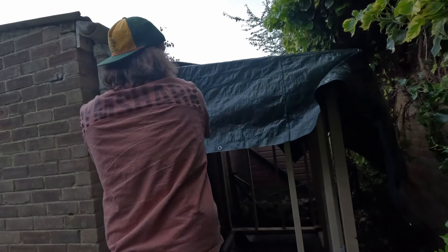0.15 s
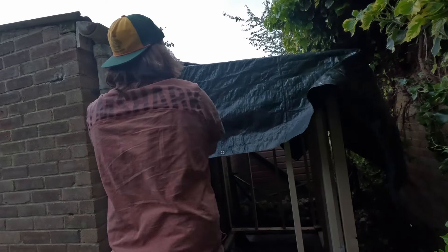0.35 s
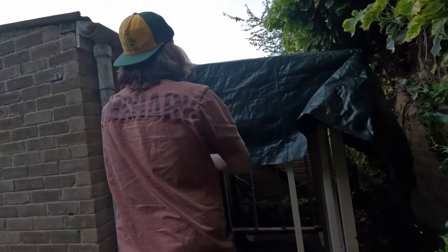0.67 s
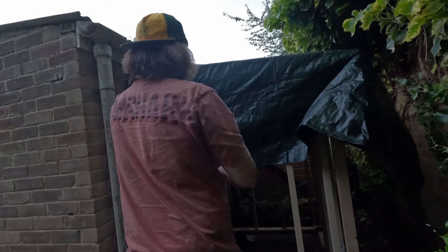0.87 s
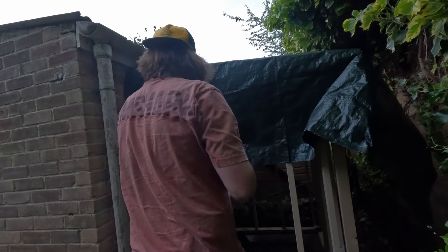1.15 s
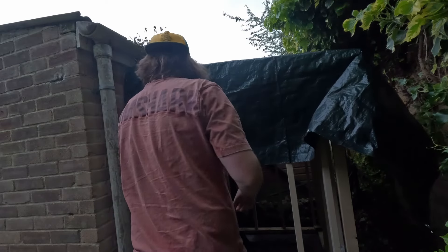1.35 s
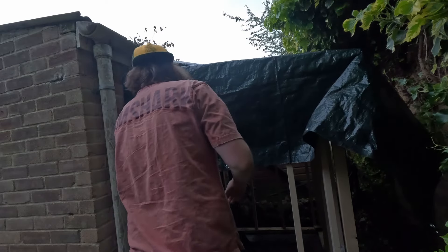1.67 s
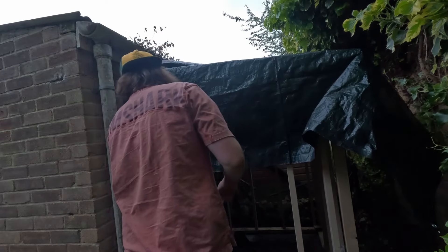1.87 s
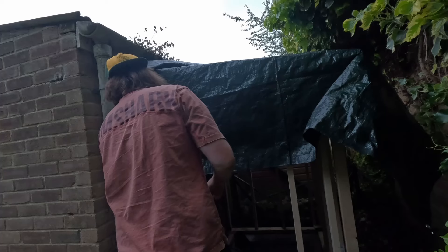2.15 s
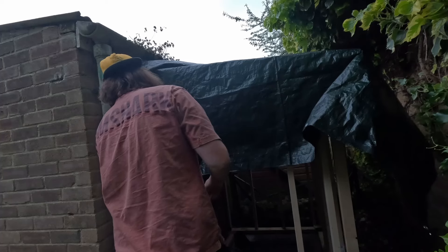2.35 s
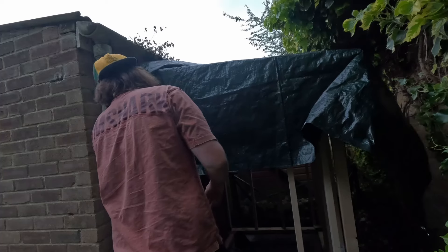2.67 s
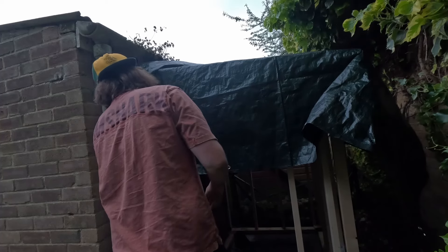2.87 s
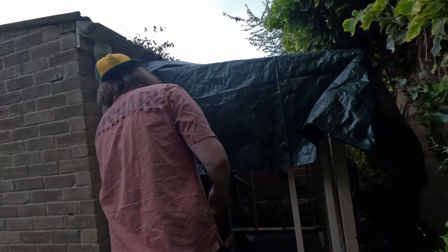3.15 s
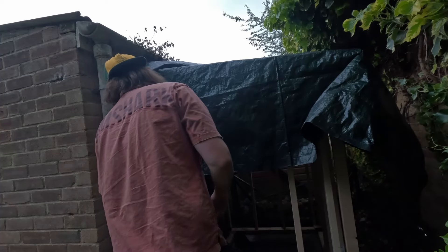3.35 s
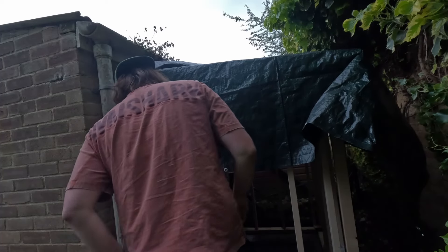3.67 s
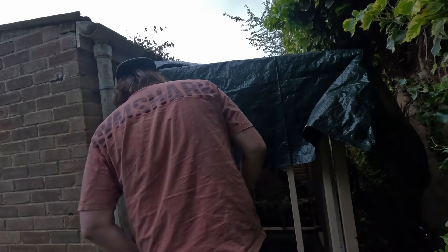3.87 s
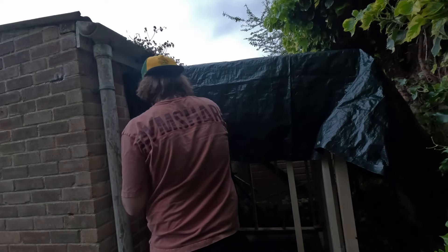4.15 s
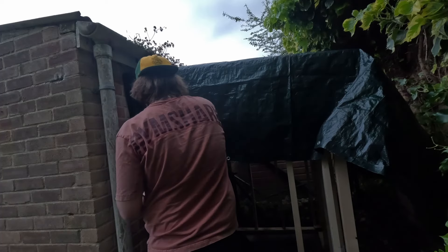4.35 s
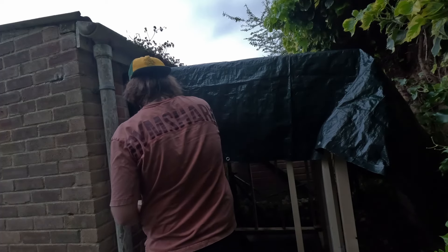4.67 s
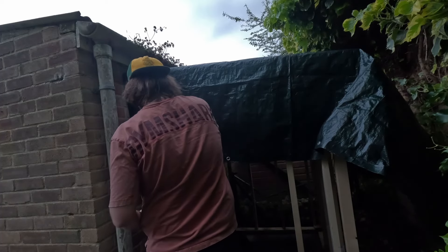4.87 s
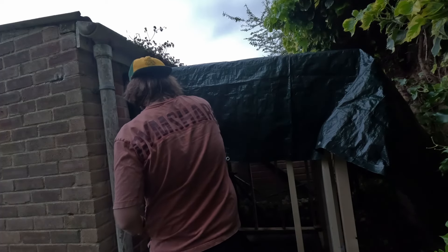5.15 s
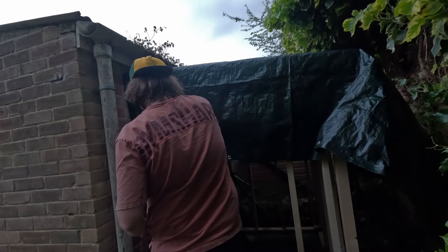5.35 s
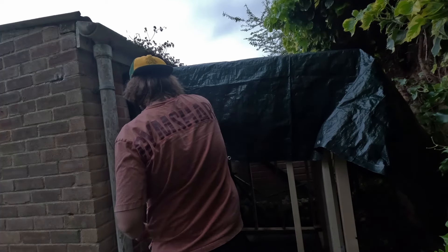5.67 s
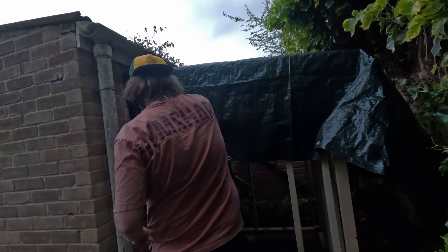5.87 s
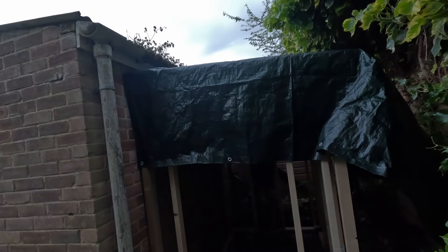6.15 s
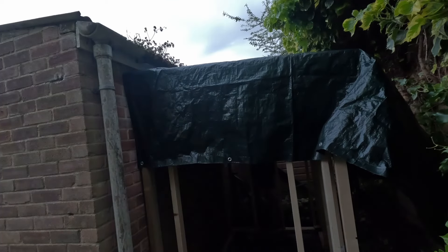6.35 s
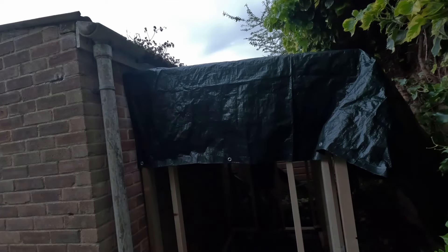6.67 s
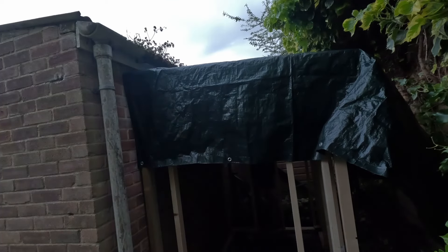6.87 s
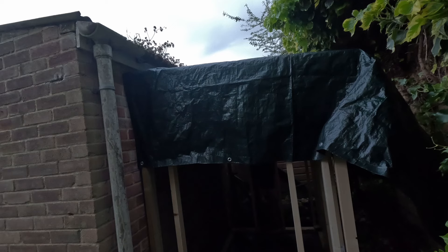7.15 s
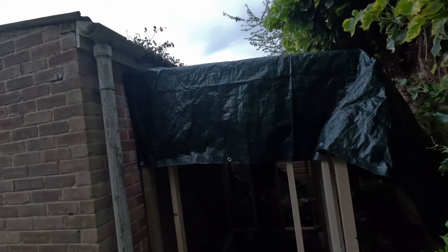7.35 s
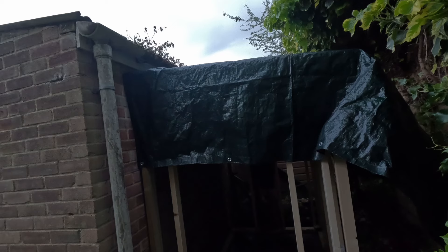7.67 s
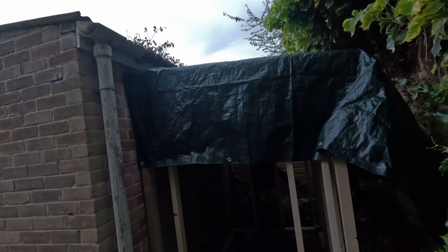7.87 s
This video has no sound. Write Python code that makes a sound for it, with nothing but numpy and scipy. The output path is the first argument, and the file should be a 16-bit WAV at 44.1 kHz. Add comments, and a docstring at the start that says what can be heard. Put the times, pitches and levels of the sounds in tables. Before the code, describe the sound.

A stiff plastic tarpaulin crackles and snaps over a timber frame, tugs settle it, then a hammer knocks nails into wood outdoors.

```python
"""A stiff woven plastic sheet crackles and snaps over a timber frame in a walled garden, then a hammer drives nails.
Folds are clumped ticks exciting short resonances; two timbers, nails and a loose metal piece are sums of
decaying modes, with noise bursts and bare pulses for the contacts. A small bird whistles in gliding sines; far
traffic and leaves are filtered noise, and an idling engine is one low sine in the first part. A decaying noise
tail adds the yard, and one small microphone with a steep top cut feeds both channels."""
import sys
import numpy as np
from scipy import signal
from scipy.fft import rfft, irfft
from scipy.io import wavfile

SR = 44100
rng = np.random.default_rng(int(sys.argv[2]) if len(sys.argv) > 2 else 0)


def dump(signal):
    """Clip the signal to [-1, 1] and save it as 16-bit WAV at the path in sys.argv[1]."""
    limited = np.clip(np.atleast_2d(signal).T, -1, 1)
    pcm = np.round(limited * 32767).astype(np.int16)
    wavfile.write(sys.argv[1], SR, pcm)


N = 353241

# Splintery spectrum of a contact: frequency_hz, response_db
CONTACT_SPECTRUM = [(200, -19.5), (500, 4), (1200, 2), (2500, -7.5), (4500, -10), (7000, -19.5),
                    (11000, -42.5)]
# Hammer blows: time_s, level_db, contact_hardness_db_per_octave, nail_grip_db, nail_ring_hz
HAMMER_BLOWS = [(3.993, -14, -2.5, -7.5, 4630), (4.246, -14, -3, -5.5, 4750), (4.486, -14, -3, -1, 4670),
                (4.717, -14, -2.5, 1.5, 4420), (4.975, -14, -3.5, 2, 5130), (5.241, -13, -1.5, 2.5, 4850),
                (5.531, -12, -1, -1, 5100), (5.791, -12, -1.5, 0.5, 5320), (6.064, -23.5, -10, 8, 3900),
                (6.3005, -5.5, -0.2, -1.5, 3980), (6.646, -5.5, 0.5, 5, 3945), (6.988, -6, 0, 9.5, 4060),
                (7.331, -6, 1, -2.5, 4070), (7.671, -7, 1, -13, 4170)]
CONTACT_LEAD_S = 0.001   # every contact starts this long before its listed time


def amp(db):
    """Decibels are twenty times the logarithm of an amplitude ratio."""
    return 10 ** (np.asarray(db) / 20)


def rms_one(x):
    """Normalization to unit mean power."""
    return x / np.sqrt(np.mean(x ** 2) + 1e-20)


def in_time(rows):
    """Linear interpolation of each column over time."""
    time_s, *columns = np.transpose(rows)
    return [np.interp(np.arange(N) / SR, time_s, column) for column in columns]


def at_hz(points, hz):
    """Interpolation along a logarithmic frequency axis."""
    frequency_hz, values = np.array(points)[:, 0], np.array(points)[:, 1]
    return np.interp(np.log(hz), np.log(frequency_hz), values)


def colour(x, points):
    """Minimum-phase filtering: a folded cepstrum makes a dB response causal."""
    log_response = at_hz(points, np.linspace(1, SR / 2, 4097)) * np.log(10) / 20
    cepstrum = irfft(log_response)
    cepstrum[1:4096] *= 2
    cepstrum[4097:] = 0
    impulse_response = irfft(np.exp(rfft(cepstrum)))
    return signal.fftconvolve(x, impulse_response)[:len(x)]


def drift(rate_hz):
    """Slow random fluctuation: white noise through two equal low-pass poles, with unit RMS."""
    r = np.exp(-2 * np.pi * rate_hz / SR)
    noise = rng.standard_normal(N + SR)
    settled = signal.lfilter([1], [1, -2 * r, r * r], noise)[SR:]
    return rms_one(settled)


def ring(clicks, hz, t60_s):
    """Damped resonance: each click excites an exponentially decaying sine."""
    r, w = amp(-60 / (t60_s * SR)), 2 * np.pi * hz / SR
    return signal.lfilter([0, np.sin(w)], [1, -2 * r * np.cos(w), r * r], clicks + 1e-18)


def tilted(x, slope_db, pivot_hz):
    """Spectral tilt: octave bands weighted by a fixed or moving slope per octave about a pivot."""
    out, rest = 0, x
    for hz in 125 * 2. ** np.arange(7):
        low = signal.sosfilt(signal.butter(1, hz * np.sqrt(2), fs=SR, output="sos"), rest)
        out = out + low * amp(slope_db * np.log2(hz / pivot_hz))
        rest = rest - low
    return out + rest * amp(slope_db * np.log2(16000 / pivot_hz))


def air():
    """Broadband superposition: far traffic and leaves merge into smooth filtered noise."""
    # time_s, level_db, brightness_db_per_octave
    far_levels = [(0, -42, -1), (3.9, -46, -2.5), (3.97, -61.5, -10.5), (6.05, -61, -9.5)]
    # frequency_hz, response_db
    far_spectrum = [(25, -24), (82, -5.5), (118, -21), (208, -8), (1650, -17.5), (5640, -31),
                    (11700, -69.5)]
    level_db, slope_db = in_time(far_levels)
    far = rms_one(colour(rng.standard_normal(N), far_spectrum))
    return tilted(far, slope_db, 607) * amp(level_db + 0.32 * drift(4.9))


def hum():
    """Periodic excitation: an idling engine gives one low line of unsteady strength."""
    # time_s, pitch_hz, level_db; silent from the last time onward
    engine_line = [(0, 89.5, -52.5), (3.9, 87.3, -50)]
    hz, level_db = in_time(engine_line)
    running = np.arange(N) < engine_line[-1][0] * SR
    line = np.sin(2 * np.pi * np.cumsum(hz) / SR)
    return np.sqrt(2) * running * amp(level_db + 0.67 * drift(4.2)) * line


def yard(x):
    """Diffuse reverberation: walls, fence and shelter scatter densely; each band has its own decay."""
    # frequency_hz, t60_s
    decay_times = [(100, 0.54), (260, 0.31), (900, 0.25), (4850, 0.25)]
    # frequency_hz, level_db
    band_levels = [(60, -4.5), (105, 11), (250, 1), (900, -3.5), (3000, -5.5)]
    t, edges, tail = np.arange(SR // 2) / SR, 60 * 2 ** np.arange(0, 8.4, .5), 0
    white = rng.standard_normal((2, len(t)))
    for k, (low, high) in enumerate(zip(edges, edges[1:])):
        half_octave = signal.butter(2, [low, high], "band", fs=SR, output="sos")
        band = signal.sosfilt(half_octave, white[k % 2])
        hz = np.sqrt(low * high)
        tail = tail + band * amp(at_hz(band_levels, hz) - 60 * t / at_hz(decay_times, hz))
    tail = tail * (1 - np.exp(-t / 0.0031))   # first reflections need a few ms
    return signal.fftconvolve(x, tail / np.sqrt(np.sum(tail ** 2)))[:N]


def bird():
    """Frequency modulation: gliding sines waver in pitch and flutter in strength."""
    # start_s, end_s, from_hz, to_hz, level_db (before waver and flutter)
    notes = [(5.175, 5.225, 3480, 3520, -56), (5.385, 5.425, 3650, 3600, -56),
             (5.385, 5.49, 5720, 5780, -66), (5.455, 5.49, 4600, 3750, -62), (5.48, 5.53, 3700, 3680, -53),
             (5.63, 5.79, 3900, 3820, -53), (5.665, 5.76, 4220, 4020, -58), (5.89, 6.025, 3400, 3390, -60),
             (5.895, 6.025, 3820, 3830, -63)]
    waver_hz, fade_s = 28, 0.008
    out, t = np.zeros(N), np.arange(N) / SR
    waver, flutter = drift(60), amp(3.5 * drift(40))
    for start, end, from_hz, to_hz, level_db in notes:
        on = slice(round(start * SR), round(end * SR))
        shape = np.clip(np.minimum(t[on] - start, end - t[on]) / fade_s, 0, 1)
        hz = np.interp(t[on], [start, end], [from_hz, to_hz]) + waver_hz * waver[on]
        tone = np.sin(2 * np.pi * np.cumsum(hz) / SR)
        out[on] += amp(level_db) * shape * flutter[on] * tone
    return np.sqrt(2) * out


def handling():
    """Power addition: drag, tugs and a faint crackle jointly set the level and brightness."""
    # The long drag over the frame: time_s, level_db, brightness_db_per_octave
    drag = [(0, -24, -0.5), (.12, -18, 1.5), (.2, -19, 1), (.35, -27, 0.5), (.445, -19.5, 1.5),
            (.62, -16.5, 2), (.72, -22.5, 1.5), (.77, -32, -2), (.84, -20.5, 2), (.92, -29.5, -1.5),
            (1.06, -33, -2), (1.1, -26, -0.5), (1.14, -34.5, -1), (1.34, -46, -4)]
    # Short tugs that settle the sheet: start_s, swell_s, hold_s, level_db, brightness_db_per_octave
    tugs = [(1.593, 0.038, 0.051, -30, -0.8), (1.737, 0.0065, 0.037, -41.5, -3),
            (1.885, 0.0039, 0.0037, -38.5, 1), (2.284, 0.0099, 0.015, -32.5, -0.3),
            (2.344, 0.026, 0.06, -25.5, -1.76), (2.486, 0.0087, 0.036, -24, -1),
            (2.58, 0.0044, 0.0038, -30, -2.5), (2.646, 0.0033, .14, -26.5, -0.1),
            (3.218, 0.013, 0.049, -37.5, -2.5), (3.456, 0.014, 0.023, -30, 0.1)]
    # Faint bright crackle between and after the tugs, dipping near 3.4 s, stopping by 3.95 s:
    # time_s, level_db
    faint = [(1.86, -56), (3.3, -72), (3.43, -64), (3.6, -52), (3.95, -70)]
    faint_slope = 4   # dB per octave
    swell_from_db, release_db_per_s = -23, 294
    t = np.arange(N) / SR
    drag_db, drag_slope = in_time(drag)
    drag_db = drag_db - release_db_per_s * np.maximum(t - drag[-1][0], 0)
    faint_db = in_time(faint)[0] + 4.5 * drift(1.4)
    parts = [(drag_db, drag_slope), (faint_db, faint_slope)]
    for start, swell, hold, level_db, slope in tugs:
        rising_db = swell_from_db * np.clip(1 - (t - start) / max(swell, 1e-3), 0, 1)
        rising_db = rising_db - 200 * (t < start)   # inaudible before the tug
        falling_db = release_db_per_s * np.maximum(t - start - swell - hold, 0)
        parts.append((level_db + rising_db - falling_db, slope))
    power = sum(amp(2 * db) for db, slope in parts)
    mean_slope = sum(amp(2 * db) * slope for db, slope in parts) / power
    return np.sqrt(power) * (t < faint[-1][0]), mean_slope


def sheet():
    """Buckling instability: folds give way in clumps, each tick ringing a facet for a few cycles."""
    # frequency_hz, response_db
    sheet_spectrum = [(110, -6.5), (238, 8.5), (346, 3.5), (680, 5), (3080, -7), (4660, -15.5), (7050, -30),
                      (11700, -49)]
    level, slope_db = handling()
    clumps = amp(1.4 * drift(100))
    sizes = amp(2.2 * np.minimum(rng.exponential(1, N), 5)) * rng.choice([-1, 1], N)
    born = rng.random(N) < 9000 * clumps / SR   # about 9000 ticks per second, clumped
    facet = rng.integers(0, 16, N)
    # three neighbouring facets wake and rest together
    patches = [amp(2.36 * drift(34.7)) for _ in range(6)]
    ticks = np.zeros(N)
    for k, hz in enumerate(np.geomspace(150, 15000, num=16)):
        clicks = sizes * born * (facet == k) * patches[k // 3]
        ticks += ring(clicks, hz, 3.33 / hz) * np.sqrt(hz)
    crackle = rms_one(tilted(ticks, 5.41, 1000))   # flattens the spectrum before it is coloured
    crackle = rms_one(colour(crackle, sheet_spectrum))
    high_pass = signal.butter(4, 130, "high", fs=SR, output="sos")
    return signal.sosfilt(high_pass, tilted(crackle, slope_db, 1450)) * level


def snaps():
    """Snap-through: a flipping fold excites two equal resonators in series with a short noise burst."""
    # Single folds snapping: time_s, level_db (of the peak, before mixing), pitch_hz
    fold_snaps = [(0.442, -8.5, 3530), (0.495, -11, 3400), (0.795, -23, 4630), (0.887, -13, 2340),
                  (0.933, -11.5, 2770), (1.027, -11, 1800), (1.087, -13, 2400), (1.101, -14, 1800),
                  (1.12, -20, 2300), (1.312, -23, 2640), (1.422, -29, 2780), (1.628, -16, 2370),
                  (1.705, -24.5, 1060), (1.758, -28, 3220), (2.353, -17, 1930), (2.428, -12.5, 2480),
                  (2.488, -15, 1560), (2.59, -25, 1010), (2.6484, -17.5, 1200), (2.696, -18, 1120),
                  (2.814, -22, 3300), (3.261, -28, 3000), (3.487, -21.5, 3780)]
    out, t = np.zeros(N), np.arange(600) / SR
    shape = (1 - np.exp(-t / .0004)) * np.exp(-t / .002)
    bursts = rng.standard_normal((len(fold_snaps), 600)) * shape
    for (time_s, level_db, hz), burst in zip(fold_snaps, bursts):
        t60_s = 6.6 / hz
        snap = ring(ring(burst, hz, t60_s), hz, t60_s)
        i = round(time_s * SR)
        out[i:i + 600] += amp(level_db) * snap / np.abs(snap).max()
    return out


def strike(events, modes, level_db, spread_db, late_s=0):
    """Modal superposition with dispersion: hard contact favours high modes, low ones arrive late."""
    bending_lag_s = 0.002985   # scale of the bending delay: half this at 1 kHz, longer for lower modes, none above 4 kHz
    thump_below_hz = 900       # hardness tilts the modes only above this
    seating_hz = 2250          # modes near this pitch follow the grip of the nail
    nail_db, nail_t60_s = -5.5, 0.013
    out, t = np.zeros(N + SR), np.arange(SR // 2) / SR
    luck = rng.standard_normal((len(events), len(modes) + 1))
    for n, (time_s, event_db, slope_db, grip_db, *nail) in enumerate(events):
        nail_modes = [(hz, nail_db, nail_t60_s) for hz in nail]
        for k, (hz, mode_db, t60_s) in enumerate(modes + nail_modes):
            lag_s = max(bending_lag_s * (np.sqrt(1000 / hz) - .5), 0)
            lag_s += max(late_s, 0) * (k < len(modes))   # the struck body answers after the nail
            contact_db = slope_db * np.log2(max(hz, thump_below_hz) / 1500)
            contact_db += grip_db * (abs(np.log2(hz / seating_hz)) < .2)
            start_db = event_db + level_db + mode_db + contact_db + spread_db * luck[n, k]
            i = round((time_s - CONTACT_LEAD_S + lag_s) * SR)
            sine = np.sin(2 * np.pi * hz * t)
            out[i:i + len(t)] += (-1) ** k * amp(start_db - 60 * t / t60_s) * sine
    return out[:N]


def metal_chinks(chinks):
    """Modal ringing: a loose metal piece sounds its own decaying modes."""
    # frequency_hz, level_db, t60_s
    metal_modes = [(1320, 1, .07), (3305, -11, .2), (4156, 0, .09), (5250, -16, .12), (7950, -19, .07)]
    return strike([(time_s, db, 0, 0) for time_s, db in chinks], metal_modes, -1.3, 0.69)


def timbers(first, second, faint_ticks):
    """Modal response: blows excite each timber and its nail; faint ticks use the first timber's modes."""
    # Both tables: frequency_hz, level_db, t60_s
    first_modes = [(138.8, -18.5, 0.53), (200, -5, 0.12), (260.2, 4, 0.096), (318.2, -4.5, 0.081),
                   (398.6, -6, 0.15), (614, -22, 0.22), (684.6, -20, 0.24), (1035, -8, 0.055),
                   (1177, 1.5, 0.041), (1400, -8, 0.11), (2093, -2.5, 0.032), (2370, 2.5, 0.016),
                   (3510, -12, 0.019)]
    second_modes = [(96.6, -22, 0.16), (185.7, -10.5, 0.066), (264, 3.5, 0.047), (363, -1, 0.068),
                    (645, -10, 0.097), (1200, -2, 0.02), (1415, -15, 0.088), (1800, -15.5, 0.029),
                    (2155, -13.5, 0.045), (2447, -21.5, 0.047), (2753, -9, 0.024), (3535, -10, 0.031)]
    blows = strike(first, first_modes, 2.0, spread_db=0.63, late_s=0.001783)
    blows += strike(second, second_modes, 0.85, spread_db=2.5, late_s=0.000915)
    ticks = strike([(time_s, db, 4.0, 0) for time_s, db in faint_ticks], first_modes, -12.0, 3.5)
    return blows, ticks


def crack(events, level_db, decay_s, rise_s):
    """Transient noise: each event gives a dense splintery burst, partly alike, that swells and dies."""
    out, t = np.zeros(N + 2000), np.arange(2000) / SR
    shape = (1 - np.exp(-t / rise_s)) * np.exp(-t / decay_s)
    shared = rng.standard_normal(2000)
    bursts = shared + .5 * rng.standard_normal((len(events), 2000))
    for (time_s, event_db, *_), burst in zip(events, bursts):
        i = round((time_s - CONTACT_LEAD_S) * SR)
        out[i:i + 2000] += amp(event_db + level_db) * burst * shape
    return colour(out[:N], CONTACT_SPECTRUM)


def contacts(events, level_db):
    """Impulse excitation: each event gives one bare pulse with the contact spectrum."""
    out = np.zeros(N)
    starts = [round((row[0] - CONTACT_LEAD_S) * SR) for row in events]
    out[starts] = amp([row[1] + level_db for row in events])
    return colour(out, CONTACT_SPECTRUM)


def hardened(x):
    """Contact stiffness: harder blows are brighter, each keeping its treble until the next."""
    time_s, _, slope_db, *rest = np.transpose(HAMMER_BLOWS)
    latest = np.searchsorted(time_s - 2 * CONTACT_LEAD_S, np.arange(N) / SR) - 1
    slope_db = slope_db[np.maximum(latest, 0)]

    def split(side):
        """Crossover: one Butterworth filter applied twice."""
        once = signal.butter(2, 2500, side, fs=SR, output="sos")
        return signal.sosfilt(np.tile(once, (2, 1)), x)

    return tilted(split("low") + amp(slope_db) * split("high"), slope_db / 2, 1300)


def scene():
    """Linear superposition of direct sounds, yard reverberation and background."""
    # Faint ticks and rustles between blows: time_s, level_db
    faint_ticks = [(4.438, -38), (4.6745, -35.5), (5.3974, -31), (5.483, -31), (5.515, -30), (5.6384, -33),
                   (5.746, -34), (6.012, -38)]
    # Loose metal piece: time_s, level_db
    chink_events = [(7.162, -31.5), (7.532, -51)]
    second_timber_from_s = 6.0   # blows after this time sound on the second timber
    first = [blow for blow in HAMMER_BLOWS if blow[0] < second_timber_from_s]
    second = [blow for blow in HAMMER_BLOWS if blow[0] > second_timber_from_s]
    light = faint_ticks + chink_events

    tarpaulin = sheet() + snaps()
    chinks = metal_chinks(chink_events)
    blows, ticks = timbers(first, second, faint_ticks)
    hard_cracks = crack(first, 4.4, 0.0025, 0.00051) + crack(second, 1.3, 0.0095, 0.0035)
    cracks = hardened(hard_cracks) + crack(light, 2.5, 0.0017, 0.00082)
    pulses = hardened(contacts(first, 30.84) + contacts(second, 27.9)) + contacts(light, 23.9)

    # upper modes carry best across the yard
    ringing = signal.sosfilt(signal.butter(2, 1500, "high", fs=SR, output="sos"), blows)
    sent = amp(-9.5) * blows + amp(-12.5) * ringing + amp(-13.5) * cracks + pulses
    sent += amp(-25.0) * chinks + amp(-12.0) * tarpaulin
    direct = blows + ticks + cracks + chinks + tarpaulin
    return np.tile(direct + yard(sent) + bird() + hum() + air(), (2, 1))


def record(dry):
    """Transducer response: coloration, a notch, saturating peaks and a steep top cut, alike in both channels."""
    # Microphone in its housing: frequency_hz, response_db
    microphone = [(25, -20.5), (100, -6.5), (7500, 2.5), (8600, -4.5), (9600, -2.5), (10700, 8),
                  (11600, -3.5), (13200, -12)]
    notch_hz, notch_sharpness, cutoff_hz = 9050, 14, 14800
    coloured = colour(dry[0], microphone)
    heard = signal.lfilter(*signal.iirnotch(notch_hz, notch_sharpness, SR), coloured)
    rounded = .98 * np.tanh(heard / .98)
    top_cut = signal.cheby2(12, 70, cutoff_hz, fs=SR, output="sos")   # 70 dB down from the cutoff up
    return signal.sosfilt(top_cut, [rounded, rounded])


dry = scene()
out = record(dry)
dump(out)
```